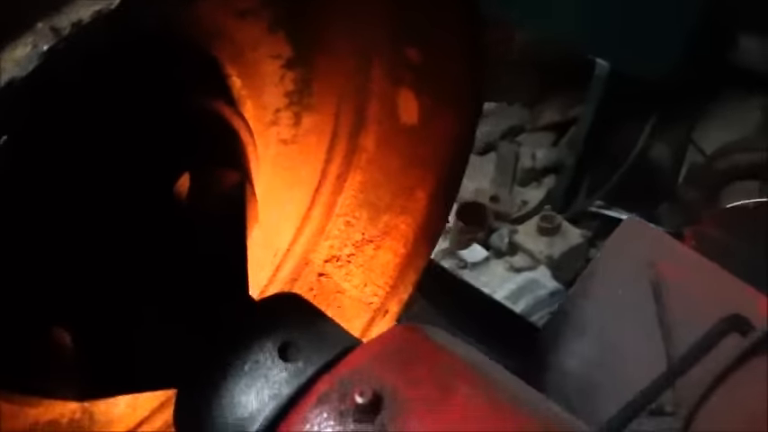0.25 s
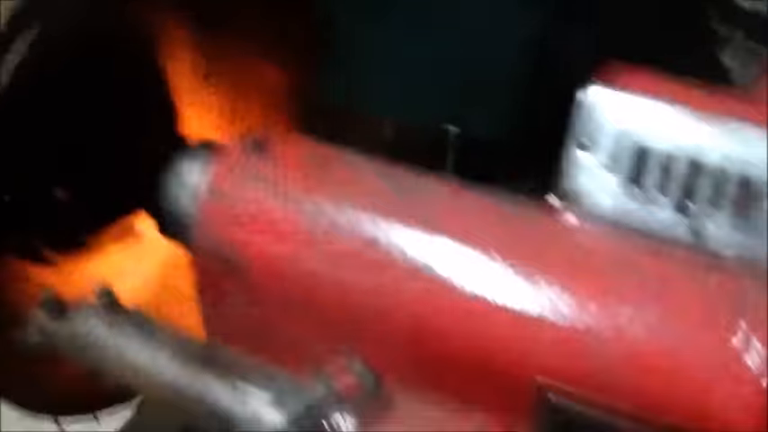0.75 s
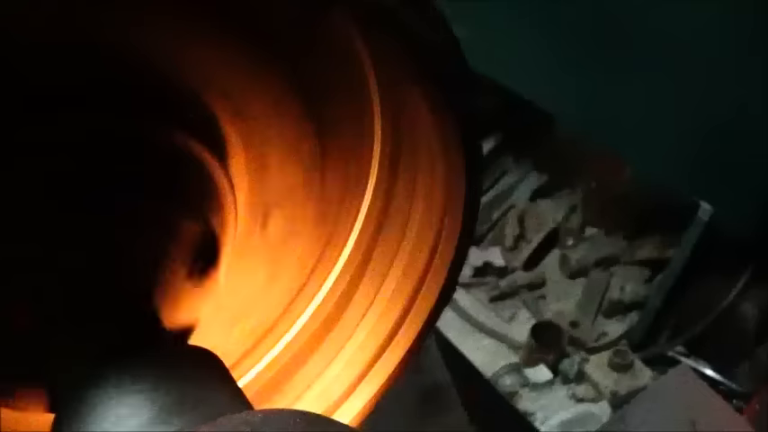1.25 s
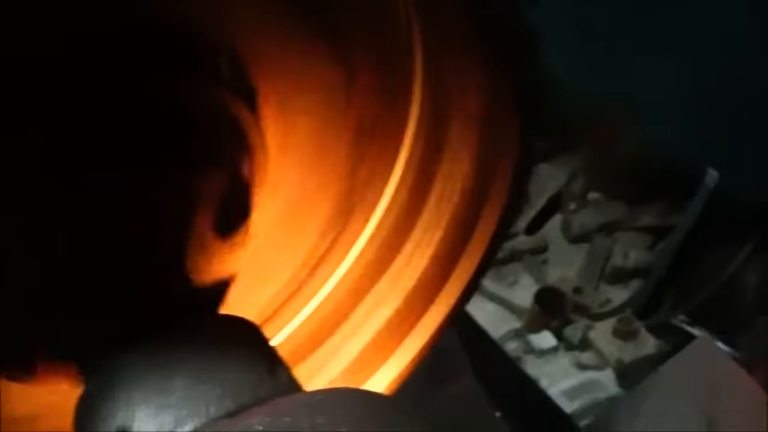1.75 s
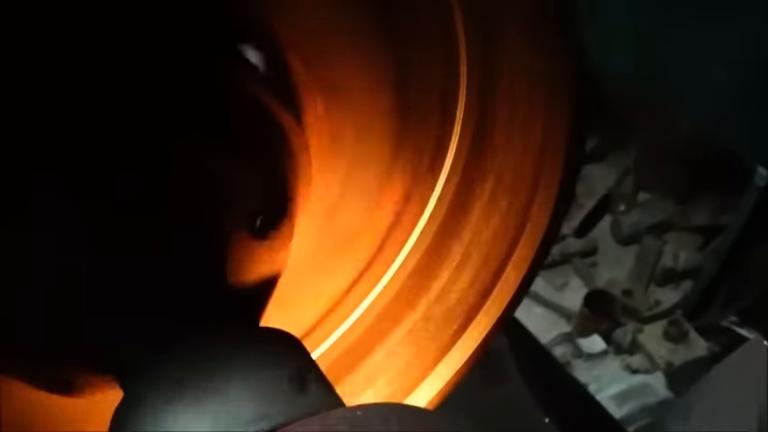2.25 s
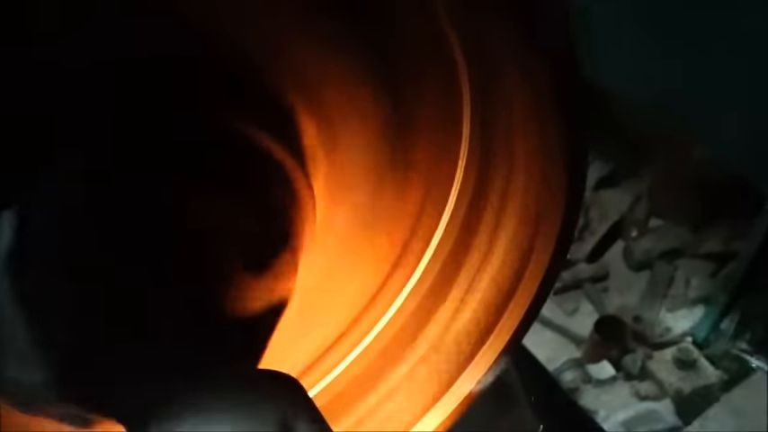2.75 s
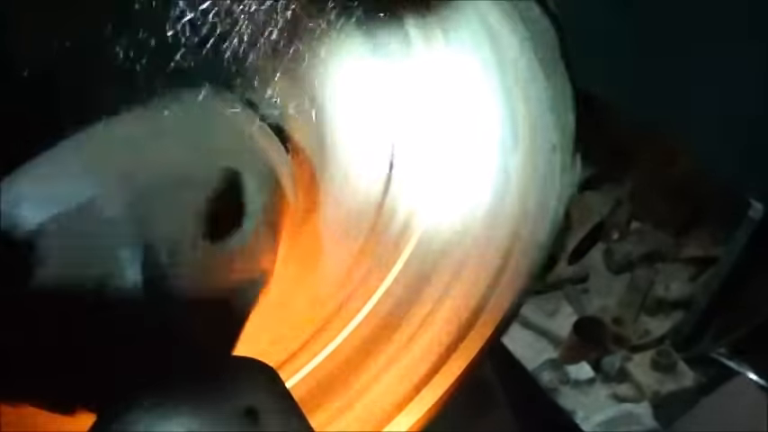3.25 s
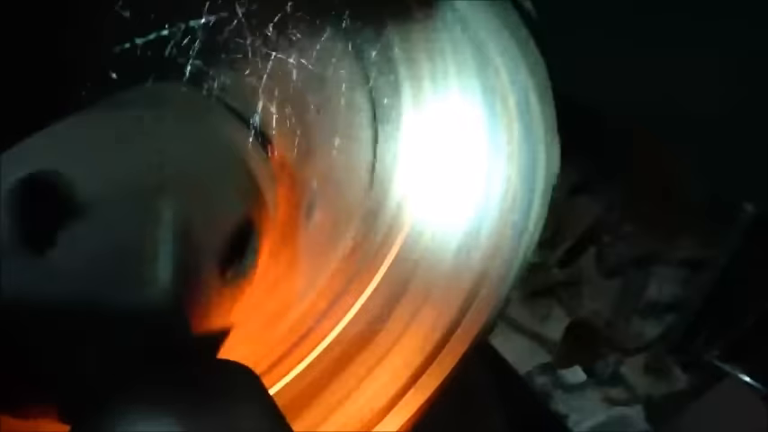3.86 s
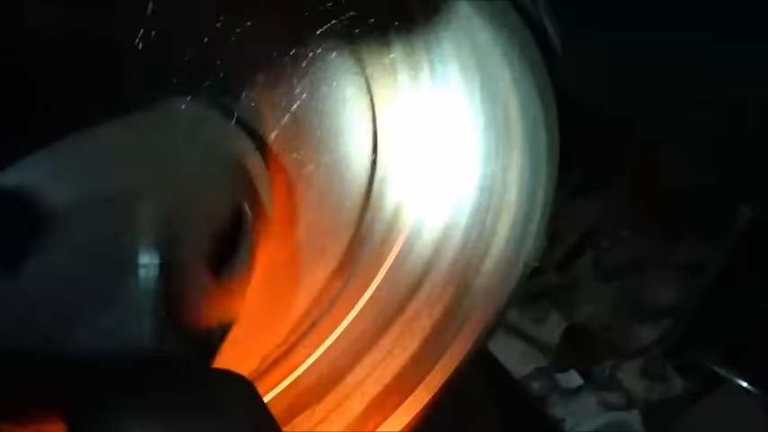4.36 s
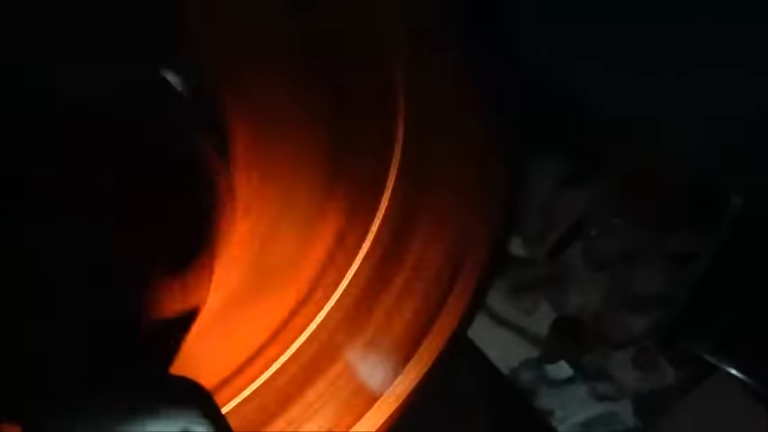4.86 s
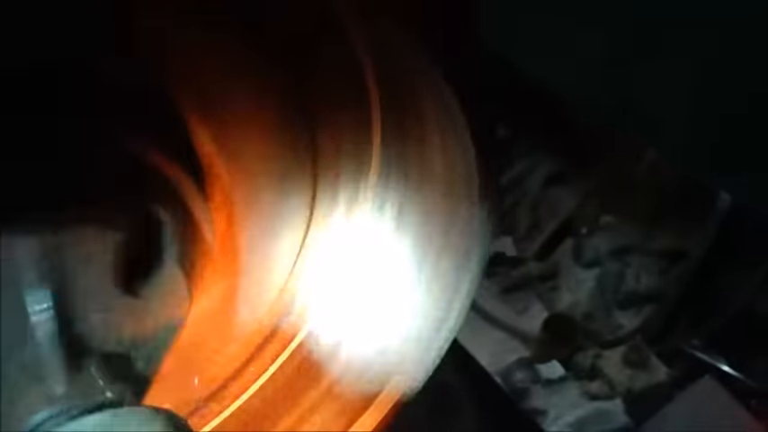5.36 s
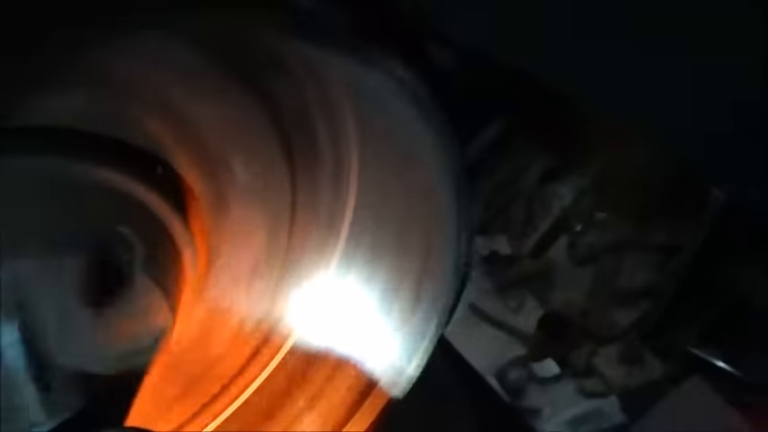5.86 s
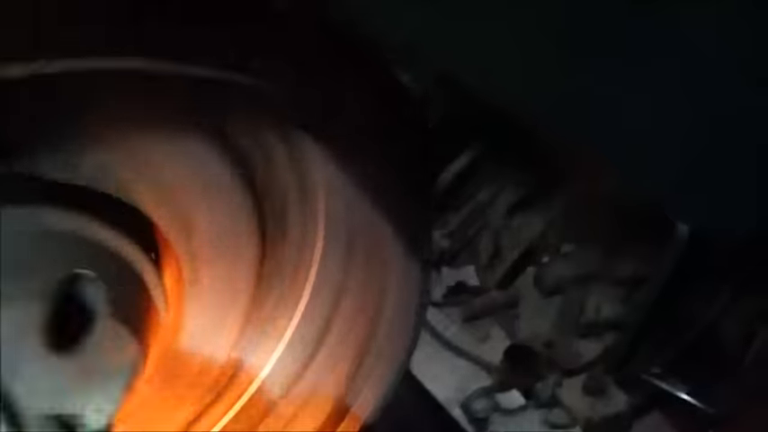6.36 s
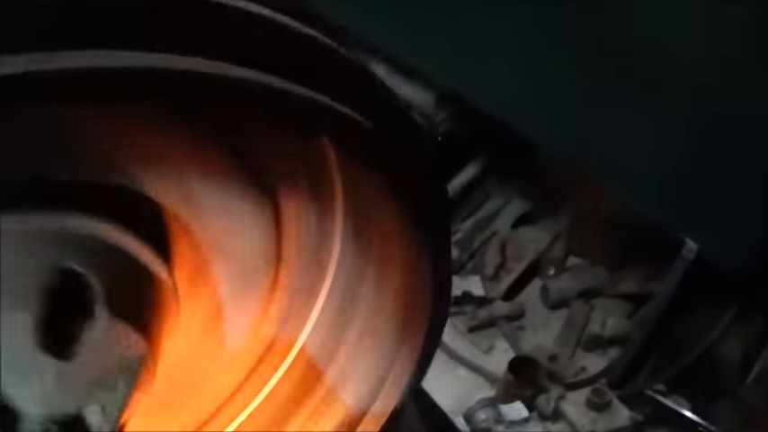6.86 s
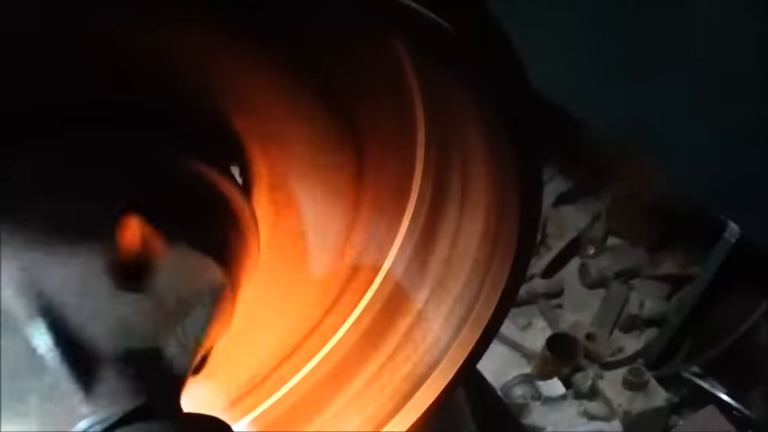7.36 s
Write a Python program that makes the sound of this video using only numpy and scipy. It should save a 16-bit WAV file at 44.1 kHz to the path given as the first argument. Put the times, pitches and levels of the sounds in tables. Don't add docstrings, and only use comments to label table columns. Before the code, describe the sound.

Idle room noise, light taps and a sharp rattling metal clack come first, followed by rubbing and crackling fabric and an abrupt short gap. Then a continuous shrill, rough metallic screech fills the rest: a bit shaving a turning cast-iron drum, many clashing high tones over chip noise and dull motor rumble, pulsing once per turn, close and slightly wide in stereo.

```python
import sys
import numpy as np
from scipy import signal
from scipy.fft import rfft, irfft, next_fast_len
from scipy.io import wavfile
from scipy.ndimage import uniform_filter1d

SR = 44100
rng = np.random.default_rng(int(sys.argv[2]) if len(sys.argv) > 2 else 0)


def voltage_ratio(level):
    return 10 ** (np.asarray(level, float) / 20)


def store_wav(level_fs):
    pcm = np.round(np.clip(np.atleast_2d(level_fs), -1, 1) * 32767)
    wavfile.write(sys.argv[1], SR, pcm.T.astype(np.int16))


N = 336042
TIME = np.arange(N) / SR
TURN_S = 0.652
TURN = np.exp(2j * np.pi * TIME / TURN_S)
JOLT = np.exp(2.6 * ((TURN * np.exp(-2j * np.pi * 0.056)).real - 1))
SHOP_LIKENESS = 0.72
REGISTER_EDGES_HZ = 130, 500, 4500


def in_time(rows):
    s, *columns = np.transpose(rows)
    return [np.interp(TIME, s, c) for c in columns]


def at_hz(points, hz):
    f, *columns = np.transpose(points)
    return [np.interp(np.log(hz), np.log(f), c) for c in columns]


def rms_one(x):
    return x / np.sqrt(np.mean(x ** 2) + 1e-20)


def drift(rate_hz):
    r = np.exp(-80 * np.pi * rate_hz / SR)
    slow = signal.lfilter([1], [1, -2 * r, r * r], rng.standard_normal(N // 40 + 2002))[2000:]
    return np.interp(np.arange(N) / 40, np.arange(len(slow)), rms_one(slow - slow.mean()))


def resonate(x, hz, width_hz):
    r = np.exp(-np.pi * width_hz / SR)
    gain = np.sqrt((1 - r ** 4) / 4) * np.sqrt(2 / (1 + r * r)) * np.sqrt(1 + r * r)
    return signal.lfilter([gain, 0, -gain], [1, -2 * r * np.cos(2 * np.pi * hz / SR), r * r], x)


def ring(clicks, hz, t60_s):
    r = voltage_ratio(-60 / (max(t60_s, 0.002) * SR))
    w = 2 * np.pi * hz / SR
    return signal.lfilter([0, np.sin(w)], [1, -2 * r * np.cos(w), r * r], clicks + 1e-18)


def pair(mid, side, alike, pan_db=0):
    alike = np.clip(alike, 0, 1)
    both = np.sqrt(1 + alike) * mid + np.sqrt(1 - alike) * side * np.array([[1], [-1]])
    return both * voltage_ratio(np.array([[0.5], [-0.5]]) * pan_db) / np.sqrt(2)


def bands(spectrum, length):
    edges_hz = 36 * 2 ** np.arange(0, 8.6, 0.5)
    white = rng.standard_normal((2, 2, length))
    for k, (low, high) in enumerate(zip(edges_hz, edges_hz[1:])):
        hz = np.sqrt(low * high)
        sos = signal.butter(2, [low, high], "band", fs=SR, output="sos")
        yield hz, voltage_ratio(at_hz(spectrum, hz)[0]) * signal.sosfilt(sos, white[k % 2])


def idle_level(register, t):
    # time_s, level_db
    room_curve = [(0, 0.5), (.25, -5.5), (.45, -10), (.6, -2.5), (.8, -3.5), (1.14, -5.5)]
    # level_db, share of the room swing followed
    registers = [(-67, .1), (-59, .9), (-53, 0.85), (-50.5, 1.2)]
    # peak_s, rise_s, fall_s, peak_db, pitch_hz
    brushes = [(.01, .05, .07, -55, 300), (.1, .08, .12, -61, 70), (.72, 0.082, 0.04, -40, 300),
               (.84, 0.15, .12, -57, 70), (.8, .06, .07, -50, 1500), (.88, 0.066, 0.076, -56, 300),
               (1.02, .04, .05, -52, 1500), (1.07, 0.067, .25, -40.5, 8000), (1.1, 0.08, .05, -44, 1500),
               (1.11, .12, .12, -54.5, 300), (1.12, .12, .12, -57.5, 70)]
    slope_db = 16
    level_db, share = registers[register]
    power = voltage_ratio(level_db + share * in_time(room_curve)[0][:len(t)]) ** 2
    for s, rise_s, fall_s, peak_db, hz in brushes:
        if np.searchsorted(REGISTER_EDGES_HZ, hz) == register:
            distance = np.maximum((s - t) / rise_s, (t - s) / fall_s)
            power = power + voltage_ratio(peak_db - slope_db * distance) ** 2
    return np.sqrt(power)


def shop(length):
    # freq_hz, level_db per Hz
    shop_colour = [(24, -36), (40, -7), (316, -3.5), (483, -3.5), (890, -2.5), (2750, -9), (3730, -2),
                   (5700, -25), (6870, -18), (9780, -9), (11000, -15), (14300, -44), (22000, -120)]
    # pitch_hz, width_hz, level_db, t60_s
    shop_whines = [(310, 84, -60.5, 3.1), (2140, 130, -58.5, 2.4), (6980, 180, -65.5, 9.7),
                   (8330, 200, -58, 1.2)]
    t = TIME[:length]
    layers = np.zeros((4, 2, length))
    for hz, (mid, side) in bands(shop_colour, length):
        flicker = voltage_ratio(1.2 * drift(11)[:length])
        layers[np.searchsorted(REGISTER_EDGES_HZ, hz)] += flicker * pair(mid, side, SHOP_LIKENESS, 1.1)
    out = sum(idle_level(k, t) * rms_one(layer) for k, layer in enumerate(layers))
    for hz, width_hz, level_db, t60_s in shop_whines:
        whine = resonate(rng.standard_normal((2, length)), hz, width_hz)
        out += voltage_ratio(level_db - 60 * t / t60_s) * pair(*whine, SHOP_LIKENESS)
    return out


def crackle(length):
    start_s, rate_per_s, level_db, pitch_hz = 0.98, 280, -42.5, 5500
    pressure = np.clip((TIME[:length] - start_s) / 0.051, 0, 1)
    sizes = voltage_ratio(4.5 * np.minimum(rng.exponential(1, length), 3)) * rng.choice([-1, 1], length)
    snaps = sizes * pressure * (rng.random(length) < rate_per_s / SR)
    tone = ring(snaps, pitch_hz, 0.002) + 0.5 * ring(snaps, 0.55 * pitch_hz, 0.0021)
    return voltage_ratio(level_db) * pair(tone, 0, 0.8, 1.5)


def thumps(length):
    # start_s, peak_db, pitch_hz
    pushes = [
        (0.635, -37, 285),
        (.642, -37, 288),
        (.815, -42, 75),
        (.836, -50, 75),
        (.905, -44, 75),
        (.936, -44, 75),
    ]
    out = 0
    for s, peak_db, hz in pushes:
        click = np.arange(length) == round(s * SR)
        out = out + ring(voltage_ratio(peak_db) * click, hz, 0.06)
    return out


def drag(length):
    # start_s, end_s, pitch_hz, width_hz, final_db
    friction = [
        (0.623, .653, 3800, 900, -39),
        (.625, .653, 13000, 4200, -36.5),
        (0.6, .653, 880, 980, -46.5),
    ]
    out, t = 0, TIME[:length]
    for start_s, end_s, hz, width_hz, level_db in friction:
        growth = np.clip((t - start_s) / (end_s - start_s), 0, 1) ** 0.72 * (t < end_s)
        noise = resonate(rng.standard_normal((2, length)), hz, width_hz)
        out = out + voltage_ratio(level_db) * growth * pair(*noise, 0.67)
    return out


def knocks(length):
    # start_s, peak_db, pitch_hz, crack_rel_db, tail_rel_db
    hits = [(.306, -32.5, 1050, -27, -38), (.334, -45, 1250, -14, -32), (.381, -34, 1670, -11, -43),
            (.388, -39, 830, -6.5, -39), (.610, -37, 900, -10, -26), (.653, -19.5, 4700, -9.5, -34.5),
            (.670, -24.5, 1500, -12, -34), (.675, -42, 8800, -5.5, -41), (0.6786, -26.5, 1900, -1.5, -27.5),
            (0.6817, -16.5, 884, -11.5, -29), (0.694, -18.5, 565, -11, -19), (0.901, -44.5, 1360, -18, -21),
            (1.051, -44.5, 2480, 2, -20), (1.078, -44, 2180, 1.5, -25)]
    # pitch_hz, level_db, t60_s
    cover_modes = [
        (855, -3, .22),
        (1130, -12, .3),
        (1290, -10, .3),
        (1312, -7, .36),
        (1500, -10, .3),
        (1570, -11, .25),
    ]
    crack_s, crack_db, cover_db = 0.00098, 4, 5
    rattle_hz, rattle_width_hz, rattle_t60_s = 1310, 2400, 0.24
    out, clicks, age = np.zeros((2, length)), np.zeros(length), np.arange(2000) / SR
    grit = signal.lfilter([1], [1, -0.4], rng.standard_normal((len(hits), 2, 2000)))
    crack_shape = age / crack_s * np.exp(1 - age / crack_s)
    for (s, peak_db, hz, rel_db, tail_db), noise in zip(hits, grit):
        at = round(s * SR)
        t60_s = 0.014 * (hz / 1e3) ** -0.35
        tone = np.sin(2 * np.pi * hz * age) + 0.56 * np.sin(2 * np.pi * 1.85 * hz * age)
        tone = tone * voltage_ratio(-60 * age / max(t60_s, 0.002))
        crack = voltage_ratio(rel_db + crack_db) * pair(*noise, 0.45) * crack_shape
        out[:, at:at + 2000] += voltage_ratio(peak_db) * (pair(tone, 0, 0.85, 5.5) + crack)
        clicks[at] = voltage_ratio(peak_db + tail_db)
    dying = signal.lfilter([1], [1, -voltage_ratio(-60 / (rattle_t60_s * SR))], clicks)
    out += dying * pair(*resonate(rng.standard_normal((2, length)), rattle_hz, rattle_width_hz), 0.51)
    return out + voltage_ratio(cover_db) * sum(voltage_ratio(db) * ring(clicks, hz, t60_s) for hz, db, t60_s in cover_modes)


def swell_db(hz):
    # freq_hz, depth_db, phase_turns
    runout = [(95, 1.5, 0.17), (300, 1.5, 0.02), (1500, 0.5, 0.011), (1900, 2.5, .02), (2700, 1.15, 0.18),
              (3250, 0.6, 0.15), (4540, 1.5, 0.22), (5000, 0.5, 0.61), (10000, 1.46, 0.58)]
    depth_db, phase = at_hz(runout, hz)
    jolt_db = 2.5 * JOLT if 200 < hz < 2000 else 0
    return depth_db * (TURN * np.exp(-2j * np.pi * phase)).real + jolt_db


def hum():
    pitch_hz, level_db, wander_hz, wobble_db, apart_rad = 95, -58, 2.2, 3.2, 0.25
    phase = 2 * np.pi * np.cumsum(pitch_hz + wander_hz * drift(5.2)) / SR
    lead = apart_rad * drift(2.5) * np.array([[1], [-1]])
    gain_db = level_db + swell_db(pitch_hz) + wobble_db * drift(6.6)
    return voltage_ratio(gain_db) * np.sqrt(2) * np.sin(phase + lead)


def scrape(bite_db, rumble_db, shift):
    # freq_hz, level_db per Hz
    scrape_colour = [(24, -59), (40, -31.5), (156, -20.5), (256, -13.5), (1530, -10.5), (1890, -11.5),
                     (2390, -17.5), (3090, 4.5), (3730, -12), (5070, -10.5), (5440, -8), (6560, -10),
                     (7040, -20.5), (9550, -7), (11000, -18), (14300, -55), (22000, -120)]
    # freq_hz, left-right likeness
    likeness = [(60, 1), (170, 1), (480, 0.92), (1370, 0.76), (3900, 0.49), (11100, 0.41)]
    level_db, tilt_db, patchy_db, pan_db = -30.5, -11.5, 2.43, 2.5
    out, together = 0, drift(7.2)
    for hz, (mid, side) in bands(scrape_colour, N):
        treble = np.clip(np.log2(hz / 2000), 0, 2) / 2
        gain_db = swell_db(hz) + patchy_db * (together / 2 + drift(19.5))
        gain_db += tilt_db * treble * shift
        gain_db += rumble_db if hz < 1600 else bite_db
        alike = at_hz(likeness, hz)[0] - 0.15
        out = out + voltage_ratio(gain_db) * pair(mid, side, alike, pan_db * min(hz / 800, 1))
    return voltage_ratio(level_db) * rms_one(out)


def drum(bite_db, rumble_db, low_db, high_db, shift):
    # pitch_hz, width_hz, polarity
    drum_modes = [(172, 16, -1), (252, 18, 1), (295, 12, -1), (377, 16, 1), (535, 16, -1), (790, 36, 1),
                  (1872, 46, -1), (2680, 200, 1), (2808, 44, -1), (3106, 34, 1), (3300, 200, -1),
                  (3490, 16, 1), (3922, 36, 1), (4365, 45, -1), (4520, 150, 1), (5128, 38, -1),
                  (5740, 45, -1), (5952, 40, 1), (6437, 40, -1), (6700, 80, 1), (7220, 180, 1),
                  (7483, 32, -1), (7822, 48, 1), (8335, 45, -1), (8640, 110, 1), (9256, 66, -1),
                  (9450, 80, 1), (9850, 500, -1), (10320, 160, 1), (10720, 90, -1)]
    # rms_db, change_db as the microphone shifts, pan_db left-right
    heard_modes = [(-62, -3, -3), (-48.5, 3.5, .1), (-50.5, -1.5, -0.5), (-48.5, 0, 0), (-55, -2, -4.5),
                   (-48.5, -2.8, 2.5), (-38, 1.5, -0.2), (-40, -11.5, 4), (-35.5, -3.5, 1),
                   (-30, -4.5, 2.5), (-40, -4, 1), (-46, -3, 7), (-42, -3, -4), (-40.5, -6, 1.5),
                   (-42, -2, 8.5), (-31.5, -4.5, 2.5), (-47.5, -8, 1), (-50.5, -14, -8), (-39.5, 4.5, 8.5),
                   (-48.5, 1, 8), (-52, -2, 5), (-49.5, -4, 2.5), (-44.5, -4.5, -5), (-48.5, -11, 7),
                   (-48, -8.5, 13.5), (-38, 0, -1.5), (-47, -14, -3), (-44.5, -2.5, 10), (-43.5, -7.5, 4.5),
                   (-49, -3, -0.5)]
    flutter_db = 1.5
    lobed_hz, lobe_db, lobe_phase_turns = 1870, 4.5, 0.03
    split = 0.24
    force = rng.standard_normal((2, N)) * voltage_ratio(0.8 * drift(60) + 0.5 * drift(8))
    out = 0
    for (hz, width_hz, polarity), (level_db, change_db, pan_db) in zip(drum_modes, heard_modes):
        group_db = rumble_db if hz < 1600 else low_db if hz < 2000 else bite_db if hz < 4800 else high_db
        gain_db = level_db + group_db + change_db * (shift - 0.5)
        gain_db = gain_db + swell_db(hz) + flutter_db * drift(12.3)
        if abs(hz - lobed_hz) < 100:
            gain_db = gain_db + lobe_db * np.cos(2 * np.pi * (4 * TIME / TURN_S - lobe_phase_turns))
        lower = resonate(force, hz - split * width_hz, 0.52 * width_hz)
        upper = resonate(force, hz + split * width_hz, 0.79 * width_hz)
        twins = lower + upper
        out = out + polarity * voltage_ratio(gain_db - 6.0) * pair(*twins, 0.93, pan_db)
    return out


def scene():
    # time_s, depth_db, microphone shift 0-1
    cut_curve = [(1.26, -0.5, 0.3), (1.9, -0.3, 0), (2.8, -0.5, 0.14), (3.4, -0.25, 0.22), (3.7, 0.5, 0.38),
                 (4.3, -0.8, 0.24), (4.6, 0.4, 0.27), (4.9, -0.45, 0.26), (5.5, 0.5, 1), (6.4, 0.5, .85),
                 (7.0, 0.5, 0.92), (7.62, 0.7, .98)]
    depth_db, shift = in_time(cut_curve)
    bite_db = depth_db - 3 + 4.12 * shift
    rumble_db = depth_db - 1.07 + 0.3 * shift
    low_db = depth_db + 0.3 - 2.1 * shift
    high_db = depth_db - 1.8 + 1.05 * shift
    out = drum(bite_db, rumble_db, low_db, high_db, shift) + scrape(bite_db, rumble_db, shift) + hum()
    length = round(1.2 * SR)
    small_body = signal.butter(2, 170, "high", fs=SR, output="sos")
    latch = signal.sosfilt(small_body, knocks(length)) + drag(length)
    out[:, :length] = shop(length) + latch + thumps(length) + crackle(length)
    return out


def low_pass(x):
    return signal.sosfilt(signal.butter(12, 11680, fs=SR, output="sos"), x)


def record(dry):
    # low_hz, high_hz, dropped share early, late
    flickering_bands = [(3640, 3780, .04, .3), (5400, 5600, .12, .45), (7950, 8150, .01, .12),
                        (8960, 9100, .01, .2), (9580, 9750, .05, .15)]
    gap_start_s, gap_end_s, cutoff_hz = 1.138, 1.2575, 11000
    size = next_fast_len(N + SR)
    hz = np.fft.rfftfreq(size, 1 / SR)
    rounded = 0.55 * np.tanh(dry / 0.55)
    top_cut = voltage_ratio(-np.clip(0.45 * (hz - cutoff_hz), 0, 90))
    x = irfft(rfft(rounded, size) * top_cut, size)[:, :N]
    fade_out = np.clip((gap_start_s - TIME) / 0.00195, 0, 1)
    fade_in = np.clip((TIME - gap_end_s) / 0.0031, 0, 1)
    x = x * (fade_out + fade_in)
    spectrum = rfft(x, size)
    for low, high, early, late in flickering_bands:
        band = irfft(spectrum * ((hz > low) & (hz < high)), size)[:, :N]
        chance = (1 + np.tanh(0.85 * drift(9))) / 2
        dropped = (chance < np.interp(TIME, [4.2, 4.8], [early, late])) & (TIME > 1.35)
        x = x - band * uniform_filter1d(dropped * 1., size=900)
    return low_pass(x)


dry = scene()
out = record(dry)
store_wav(out)
```